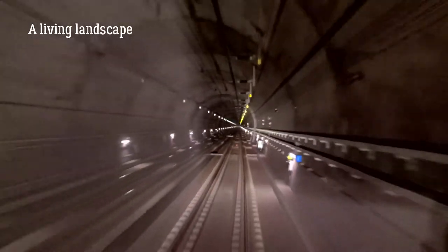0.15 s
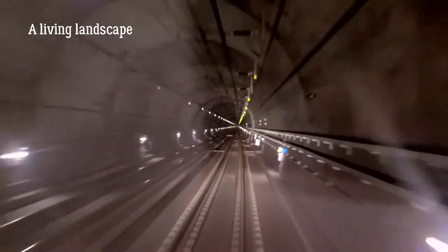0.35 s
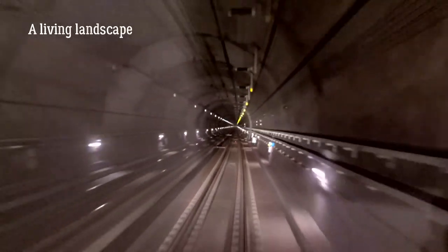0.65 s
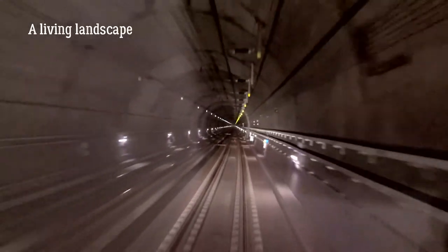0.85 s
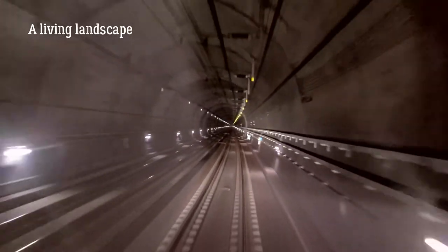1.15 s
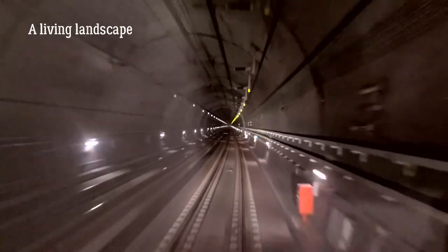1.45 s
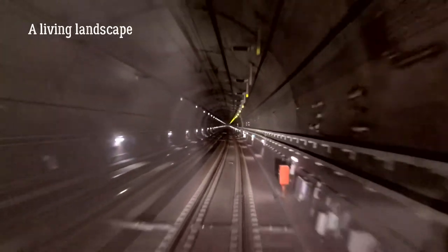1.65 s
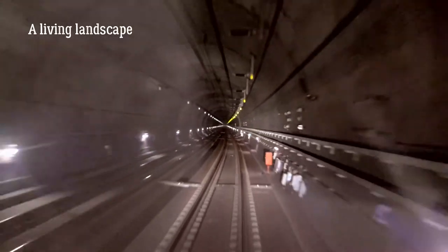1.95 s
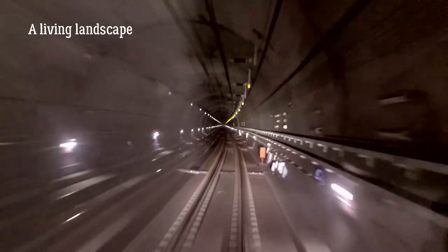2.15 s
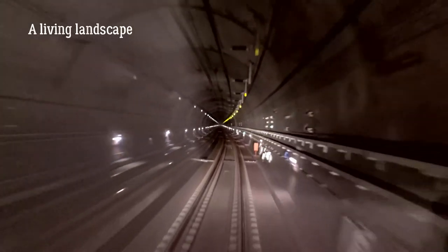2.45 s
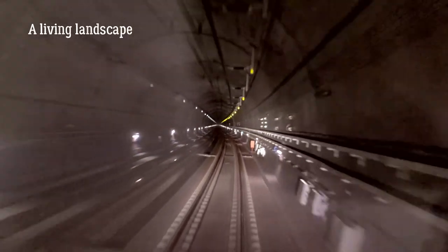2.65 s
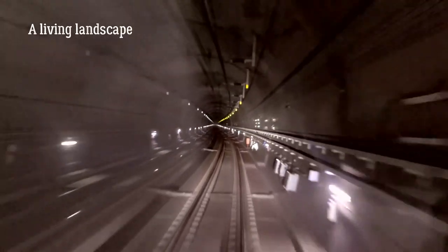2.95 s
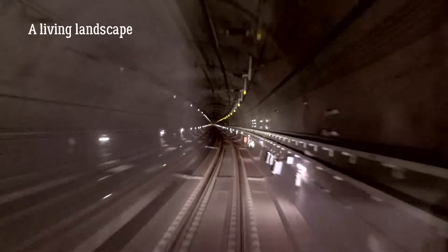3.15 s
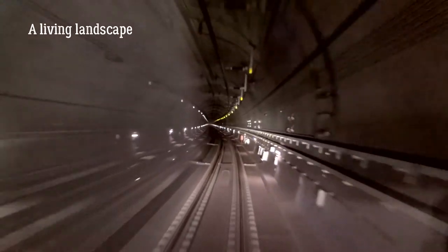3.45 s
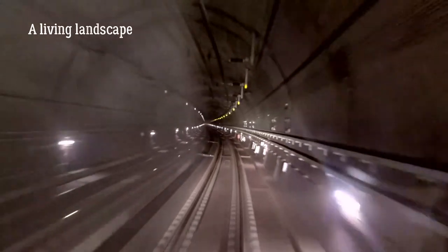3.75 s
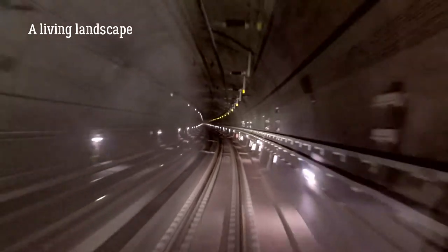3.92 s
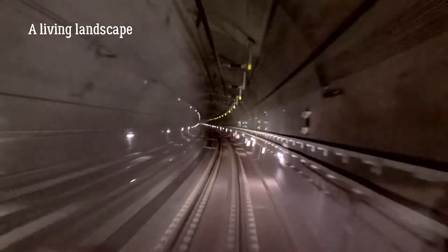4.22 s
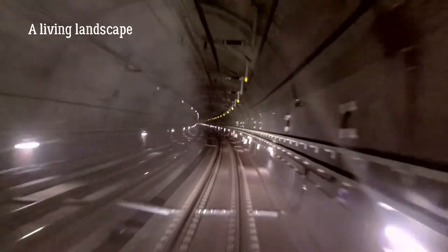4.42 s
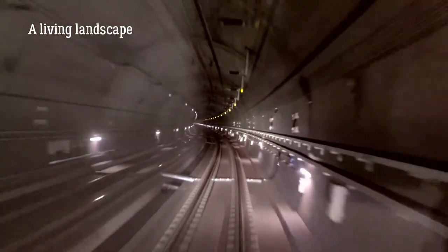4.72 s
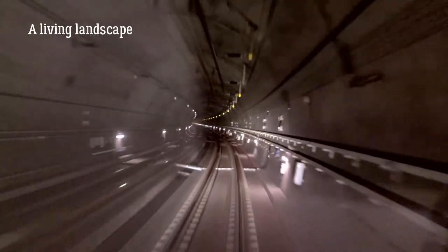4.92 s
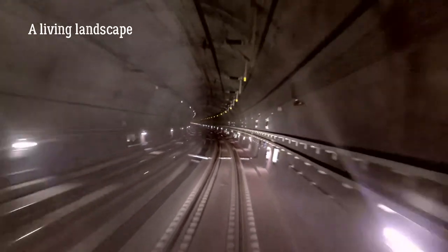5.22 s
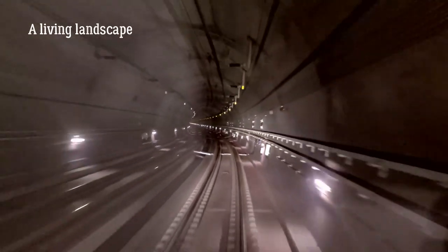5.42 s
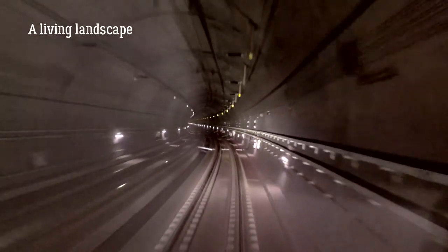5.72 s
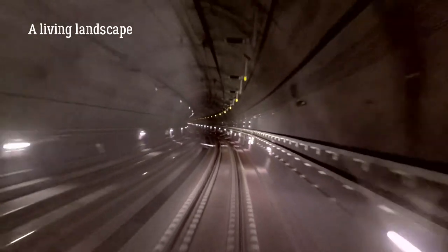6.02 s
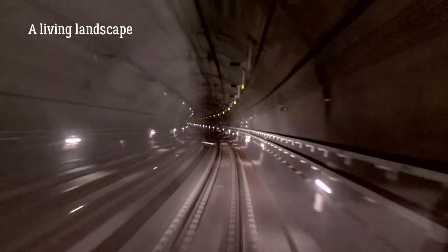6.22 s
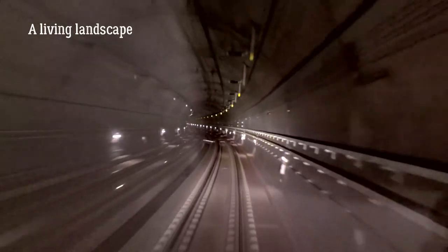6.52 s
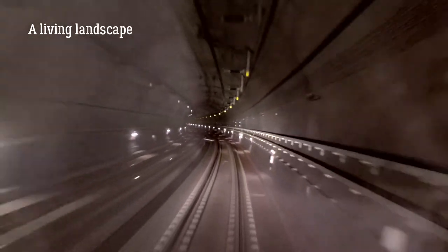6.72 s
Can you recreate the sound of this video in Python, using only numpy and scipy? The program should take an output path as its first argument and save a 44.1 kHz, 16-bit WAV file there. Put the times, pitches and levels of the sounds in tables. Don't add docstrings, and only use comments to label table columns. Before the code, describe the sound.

A continuous fast train run through an enclosed tunnel, with no stops or horn. Thick bass rumble and floor roar hold steady while low and middle humming notes flicker and glide unevenly. The second half gets rougher, with the rail singing more strongly in short swells. Weak rushing air, faint high motor whine and sparse soft clicks remain buried. Microphones are inside the cab, close and loud, bass central and upper tones spread wide.

```python
import sys
import numpy as np
from scipy import signal
from scipy.fft import rfft, irfft, next_fast_len
from scipy.io import wavfile
from scipy.ndimage import uniform_filter1d, minimum_filter1d, map_coordinates

SR = 44100
rng = np.random.default_rng(int(sys.argv[2]) if len(sys.argv) > 2 else 0)


def generate_wav(signal):
    frames = np.transpose(np.atleast_2d(signal))
    scaled = np.clip(frames, -1, 1) * 32767
    pcm = np.round(scaled).astype(np.int16)
    wavfile.write(sys.argv[1], SR, pcm)


def how_loud(loudness_db):
    steps = np.asarray(loudness_db, float) / 20
    return 10 ** steps


N = 302967

# (resting level [dB], share of load [dB/dB], unrest [dB], swell rise [s], swell fall [s])
HABITS = [(-26, .05, 2, 0.034, 0.044), (-35.5, 0.2, 2.5, 0.032, 0.026), (-40.5, 0.63, 0.5, 0.032, 0.023),
          (-34.5, 2.4, 1, 0.062, 0.046), (-37.5, .05, 4, 0.022, 0.048), (-37.5, 0.22, 3, 0.022, .035),
          (-47, 0.89, -1.5, 0.066, 0.029), (-43, 0.89, 5, 0.018, 0.018), (-36.5, .2, 2, .035, 0.02),
          (-38, 0.55, 3, 0.031, 0.025), (-40.5, .8, 3.5, 0.038, 0.024), (-41, .1, 3, 0.049, .045)]
# (time [s], peak level [dB], pitch [Hz])
RAIL_SWELLS = [(0.23, -28, 765), (0.41, -28.5, 781), (0.51, -25, 758), (0.68, -28, 777),
               (0.76, -28.5, 780.5), (0.93, -26.5, 772.3), (1.06, -29, 770.5), (1.18, -27.5, 767.3),
               (1.62, -26.5, 773), (1.74, -31, 771), (1.86, -30, 765.5), (2.03, -23.5, 780.4),
               (2.16, -30.5, 756.4), (2.4, -26, 769.4), (2.6, -26.5, 774), (2.76, -26, 763.4),
               (2.901, -22.5, 766.7), (3.05, -26, 782.6), (3.12, -35, 768), (3.33, -24.5, 769.4),
               (3.45, -21, 761), (3.75, -21, 767), (3.93, -26.5, 762.7), (4.01, -37, 769), (4.2, -31, 768),
               (4.31, -22, 770.7), (4.42, -29, 771), (4.61, -20.5, 763), (4.84, -36, 772.2),
               (4.96, -18.5, 770.3), (5.22, -21, 768.8), (5.38, -19.5, 767), (5.63, -17.5, 763.4),
               (5.76, -28.5, 762), (5.94, -33, 771), (6.09, -19, 768.7), (6.23, -20, 763),
               (6.4, -23.5, 771), (6.58, -24.5, 778.5), (6.76, -24, 773.4)]
# (time [s], lift [dB], length [s])
WHEEL_LIFTS = [
    (.3, -0.5, 0.36),
    (1.1, 0.5, 0.2),
    (2.3, 0, 0.2),
    (2.8, .9, 0.48),
    (3.6, -0.7, .8),
    (5.2, 1, .6),
    (6.05, 0, 0.54),
    (6.6, 1, 0.41),
]
PANEL_HZ = [86, 205, 235, 392, 503, 612, 688, 722, 782, 802, 842, 1480, 1584, 1875, 2008, 2166, 2296, 2623,
            5262, 5351, 5360, 8870, 11240]
# (width [Hz], rms level [dB], left-right [dB], likeness [-1..1])
PANELS = [(19.5, -27.5, -0.1, 1), (12.5, -32.5, 0.7, .999), (11.9, -37, 4, .999), (21, -35.5, 6, 0.033),
          (11.1, -37.5, 5.5, -0.22), (14, -37, 0.5, 0.042), (36, -34.5, 8.5, -0.5), (21, -37.5, 2.5, -0.91),
          (21.1, -42.5, 3, 0.12), (16, -37, 7.5, -0.19), (21, -42, 4, 0.55), (41, -54, -1.5, 0.64),
          (37, -51, 1, 0.3), (19, -58, -1.5, 0.16), (29, -58.5, -1, 0.34), (21, -63.5, -1.5, 0.42),
          (13, -63.5, 5, .61), (19, -67.5, 5, -0.00091), (41, -75, 2.5, .3), (22, -74, 3.5, .5),
          (240, -72.5, 7.5, -0.13), (120, -86.5, -5, -0.085), (7, -100, -4.5, .11)]


def along(points, hz):
    f, v = np.transpose(points)
    return np.interp(np.log(hz + 1), np.log(f + 1), v)


def curves(rows):
    s, *cols = np.transpose(rows)
    return [np.interp(np.arange(N) / SR, s, c) for c in cols]


def wobble(rate_hz):
    knots = rng.standard_normal(int(N / SR * 40))
    return map_coordinates(knots, [np.arange(N) * min(rate_hz, 39) / SR])


def grid_hz():
    return np.fft.rfftfreq(next_fast_len(N + 8192) // 2 * 2, 1 / SR)


def pair(gain, alike, lean_db):
    mid, side = rng.standard_normal((2, len(gain))) + 1j * rng.standard_normal((2, len(gain)))
    turn = np.arccos(np.clip(alike, -1, 1)) / 2
    mid, side = mid * np.cos(turn), side * np.sin(turn)
    left = (mid + side) * how_loud(lean_db / 2)
    right = (mid - side) * how_loud(-lean_db / 2)
    both = irfft(gain * np.array([left, right]))[:, :N]
    return both / np.std(both.mean(axis=0))


def load():
    # (time [s], load [dB])
    roughness = [
        (0, -2.5),
        (1.4, -2.5),
        (2.2, -1.5),
        (3.0, -1.5),
        (3.7, 1.2),
        (4.5, 0.6),
        (5.0, 0.9),
        (5.6, 1),
        (6.2, -0.2),
        (6.87, 2),
    ]
    slow_db = uniform_filter1d(curves(roughness)[0], size=SR // 4)
    return slow_db - slow_db.mean()


def swells(rows, rise_s, fall_s):
    s, db = np.transpose(rows)[:2, :, None]
    coarse = np.arange(0, N + 100, 100)
    t = coarse / SR - s
    flank_s = np.where(t < 0, rise_s, fall_s)
    power = np.sum(how_loud(db) ** 2 * np.exp(-(t / flank_s) ** 2), axis=0)
    return np.sqrt(np.interp(np.arange(N), coarse, power))


def gusts(rows):
    t = np.arange(N) / SR
    return sum(db * np.exp(-(2 * (t - s) / length_s) ** 2) for s, db, length_s in rows)


def roar():
    # (frequency [Hz], density [dB per Hz])
    rumble = [(8, -38.5), (20, -3), (32, -2), (52, 0.5), (70, -0.5), (105, -1), (150, -0.9), (186, -6),
              (230, -19.5), (400, -43), (700, -120)]
    floor = [(60, -120), (120, -26.5), (186, -7), (210, -0.5), (270, 1), (300, 1.5), (332, -0.5),
             (370, 2.5), (450, 1.5), (500, -3.5), (540, -5.5), (600, -16.5), (800, -39.5), (1200, -120)]
    rail = [(300, -120), (451, -30.5), (581, -2), (671, 0), (801, 4), (871, -12.5), (1001, -20.5),
            (1301, -49), (2000, -120)]
    wheel = [(400, -120), (601, -21.5), (881, 0), (951, 0), (1091, -1), (1211, -5), (1401, -8.5),
             (1601, -10), (1801, -15.5), (2551, -22.5), (3501, -25), (4101, -32), (5601, -38),
             (12000, -120)]
    hiss = [(1500, -120), (2501, -25.5), (4501, -1.5), (6301, -2.5), (8001, -4), (9501, -10.5),
            (10501, -12), (13001, -14), (16001, -18)]
    # (frequency [Hz], likeness [-1..1])
    likeness = [(25, .99), (60, .997), (200, .994), (300, .95), (380, .55), (470, 0), (580, -.4), (800, .4),
                (920, .15), (1010, -.2), (1180, -.8), (1300, -.6), (1400, 0), (1800, -.35), (2200, .3),
                (2700, -.1), (4000, .03), (8000, .2), (13000, .2)]
    # (frequency [Hz], left-right [dB])
    lean = [(151, -0.5), (261, 1), (401, 5.5), (521, 1.5), (801, 1), (1001, 0), (1201, -2), (1401, -0.8),
            (2701, 4), (3601, 2.1), (5001, 1.6), (7001, 4.5), (8801, -3), (15001, 1.3)]
    # (mean level [dB], share of load [dB/dB], slow sway [dB])
    paths = [
        (-20.5, .03, -0.3),
        (-20.5, 0.3, 0.2),
        (-27, 0.96, 0.6),
        (-34, 0.29, -0.7),
        (-63.5, .15, 0.15),
    ]
    # (time [s], lift [dB], length [s])
    air_gusts = [
        (1.448, 0.7, 0.59),
        (2.23, 3, 0.17),
        (2.577, 0, 0.2),
        (4.02, 2, 0.23),
        (4.338, 1, 0.15),
        (5.12, 1.5, 0.32),
        (5.8, -0.3, 0.53),
    ]
    hz = grid_hz()
    rail_swell = swells(RAIL_SWELLS, *HABITS[3][3:]) / how_loud(HABITS[3][0])
    rail_lift_db = 10 * np.log10(1 + 0.052 * rail_swell ** 2)
    lifts_db = (0, 0, rail_lift_db, gusts(WHEEL_LIFTS), gusts(air_gusts))
    colours = (rumble, floor, rail, wheel, hiss)
    flutters_db = (0.31, 1.2, 0.34, 0.59, 0.96)
    total = np.zeros((2, N))
    for (db, follow, sway_db), lift_db, colour, flutter_db in zip(paths, lifts_db, colours, flutters_db):
        level_db = db + follow * load() + sway_db * wobble(1.8) + lift_db
        noise = pair(how_loud(along(colour, hz)), along(likeness, hz), along(lean, hz))
        total += how_loud(level_db + flutter_db * wobble(7)) * noise
    return total


def hum():
    # (pitch drift [Hz], left-right [dB], left phase lead [rad])
    hummers = [(1.5, 0, -.08), (4, 2.8, 0), (3.5, 7, 0), (5, 5, -.2), (2, 0, 0), (2, 0, 0), (3, 1, 1.2),
               (4, 2, .3), (2, .7, 0), (4, 5, -.1), (5, 3, -.1), (4, 0, -.04)]
    # (time [s], peak level [dB], pitch [Hz])
    bounces = [(0.06, -16.5, 69.55), (0.55, -15.5, 66.45), (0.64, -16, 63.4), (0.72, -31, 67),
               (1.1, -15.5, 63.8), (1.26, -17, 62), (1.57, -16.5, 66.15), (1.9, -15, 69.4),
               (2.15, -17.5, 66.44), (2.25, -21.5, 64.84), (2.36, -17, 64), (2.54, -16, 64.9),
               (2.73, -12.5, 69.1), (3.28, -17, 64.45), (3.55, -24, 68.9), (3.69, -21, 66.1),
               (3.95, -18, 68.23), (4.09, -21, 68), (4.23, -16, 66.45), (4.34, -13, 68.07),
               (4.48, -20, 65.8), (4.57, -21, 64.2), (4.66, -19, 68.03), (4.89, -23, 65.63),
               (5.05, -16, 66.1), (5.18, -16, 65.06), (5.34, -17.5, 65.94), (5.58, -13, 70),
               (5.7, -14, 67.66), (5.88, -19, 67), (5.98, -17.5, 65.92), (6.41, -16, 69.88),
               (6.6, -16, 68.2), (6.76, -16.5, 65.46)]
    length_swells = [(0.02, -21, 289), (0.55, -19, 292), (0.69, -18.5, 296), (1.3, -16, 297),
                     (1.48, -16, 290), (1.9, -22, 296), (2.53, -21, 289), (2.89, -23, 290),
                     (3.04, -18.5, 299), (3.36, -18, 293), (3.48, -24, 298), (3.57, -19.5, 291),
                     (4.05, -21, 298), (4.19, -14.5, 291), (4.27, -15.5, 295), (4.57, -25.5, 291),
                     (5.1, -16.5, 299), (5.22, -24.5, 295), (5.44, -18, 295), (5.52, -16, 297),
                     (5.71, -27, 297), (6.43, -23, 298)]
    cross_swells = [(0.77, -24.5, 419.4), (0.93, -30, 421), (1.53, -23.5, 414), (1.91, -26.5, 420.3),
                    (2.16, -22.5, 418.5), (2.23, -19.5, 420.5), (2.34, -22, 423.3), (2.53, -22, 423),
                    (2.64, -26, 418.7), (2.74, -21, 422), (3.49, -17.5, 421), (4.11, -29, 422.2),
                    (4.32, -23, 417.5), (4.43, -22, 423.8), (4.51, -24.5, 428), (4.89, -20.5, 419.6),
                    (4.96, -32, 419.3), (5.109, -23, 419.6), (5.46, -23, 421), (5.6, -19, 424),
                    (5.76, -21, 413), (5.83, -12, 425.8), (5.9, -28, 425), (5.97, -28.5, 425),
                    (6.06, -17, 424), (6.12, -15.5, 425), (6.18, -18.5, 428.4), (6.24, -17.5, 423.6),
                    (6.29, -20, 427.7), (6.35, -16.5, 425.5), (6.51, -26, 422.7), (6.67, -23.5, 428)]
    floor_swells = [(0.94, -16.5, 87.7), (1.3, -21, 89.35), (1.67, -24, 90.7), (1.78, -18, 92),
                    (2.08, -17, 93.95), (2.94, -23, 88.86), (3.09, -16, 85.2), (3.4, -19, 89.8),
                    (4.21, -18, 89.9), (4.65, -21, 93.6), (5.1, -18, 87.8), (5.23, -15, 89.4),
                    (5.46, -18.5, 93.05), (5.73, -19.5, 90.5), (6.0, -21, 88), (6.54, -20, 87.74),
                    (6.66, -31, 88.4), (6.81, -18.5, 87.4)]
    door_swells = [(0.29, -26, 236), (0.52, -20, 234), (1.6, -23, 231), (1.94, -19, 237.8),
                   (2.07, -21, 232.9), (2.85, -18.5, 231.1), (3.02, -24, 238), (3.2, -22.5, 232.8),
                   (3.59, -22, 233), (3.81, -24, 233.4), (4.17, -29, 232.5), (4.47, -17.5, 237),
                   (4.69, -23, 234), (4.85, -22.5, 238.6), (5.22, -27, 232.7), (5.41, -23, 237.7),
                   (5.51, -32, 237), (5.64, -21, 230.2)]
    wall_swells = [(3.01, -28, 492), (3.12, -26, 496.6), (3.21, -30, 502), (3.48, -28, 488),
                   (3.76, -22.5, 495.7), (4.07, -25, 495), (4.28, -27.5, 490), (4.899, -26, 489.6),
                   (5.1, -25, 494), (5.23, -23, 496.9), (5.51, -22.5, 504.6), (6.04, -26, 502.5),
                   (6.42, -27, 508), (6.54, -34, 506.4)]
    roof_swells = [(2.21, -25, 650.3), (3.07, -28, 651.8), (3.42, -20.5, 668.3), (3.57, -26, 667.7),
                   (3.819, -24.5, 652), (4.05, -33, 653), (4.13, -20, 661.8), (4.3, -16.5, 626.6),
                   (4.5, -22, 661.2), (4.71, -20.5, 657), (4.91, -30, 658.3), (4.99, -26, 668),
                   (5.1, -22, 667.4), (5.19, -29, 648.4), (5.53, -21.5, 650.6), (5.61, -24, 665),
                   (5.72, -24, 627), (5.84, -23, 656.2), (5.97, -25, 657.3), (6.27, -24, 667.6),
                   (6.39, -24, 672), (6.76, -27, 669)]
    seat_swells = [(0.12, -16.5, 204), (1.29, -27, 204), (1.39, -28, 205.8), (2.5, -20, 205.5),
                   (2.8, -23, 204), (2.98, -23, 205.8), (3.54, -22.5, 207.1), (3.63, -20, 206.5),
                   (3.73, -28, 207), (3.88, -25.5, 206.2), (4.55, -22, 209.4), (4.71, -21.5, 207.3),
                   (4.91, -17, 207.2), (5.1, -17, 203.7), (5.28, -22, 207.6), (6.1, -29, 207),
                   (6.39, -21, 209), (6.68, -25, 204.5)]
    window_swells = [(0.019, -18, 392), (0.64, -23, 384), (0.96, -21, 390.7), (2.28, -18, 393.3),
                     (2.63, -17.5, 396), (2.73, -18.5, 389.7), (2.81, -29, 391.7), (2.97, -24, 396),
                     (3.32, -29, 394.8), (3.46, -28, 393.9), (3.58, -21, 391.8), (3.87, -25, 396),
                     (4.26, -26, 391.6), (4.57, -29.5, 390.7), (4.64, -24, 388.5), (4.78, -26, 386.8),
                     (4.86, -23, 392.4), (5.01, -24, 392.4), (5.57, -18, 390), (5.85, -20.5, 396.6),
                     (5.93, -19, 394.2), (6.13, -23.5, 387.9), (6.23, -19.5, 393.8), (6.331, -12.5, 392.2),
                     (6.45, -19, 390), (6.54, -21, 391)]
    web_swells = [(0.41, -27, 793), (0.601, -24, 797), (1.639, -29, 802), (2.0, -26, 796), (2.59, -28, 791),
                  (2.66, -23.5, 790), (2.9, -25.5, 785.6), (3.04, -18, 795.5), (3.2, -27, 803),
                  (3.43, -27, 796.6), (3.6, -22.5, 797), (3.72, -17, 788.2), (3.88, -26, 787),
                  (4.0, -16, 786), (4.31, -26, 798), (4.6, -22, 792), (4.96, -26, 783), (5.15, -33, 791.6),
                  (5.22, -29, 780.4), (5.34, -30, 798), (5.43, -20, 776), (5.59, -25, 786),
                  (5.74, -24, 796), (5.94, -26, 779.5), (6.09, -19, 774.3), (6.28, -22, 796.6),
                  (6.4, -31, 784), (6.58, -31, 790), (6.75, -22, 787.6), (6.82, -29, 795)]
    bogie_swells = [(0.09, -22.5, 134.6), (0.35, -21.5, 144.1), (0.53, -22.5, 137.7), (0.69, -20, 137.5),
                    (1.07, -21.5, 144.6), (1.23, -25, 136), (1.48, -23, 143.5), (1.7, -21.5, 144.3),
                    (2.27, -23.5, 136), (2.88, -23.5, 139.9), (3.28, -23, 134.4), (3.53, -24, 142.1),
                    (4.29, -25.5, 141), (5.36, -23.5, 139), (5.68, -27, 141.9), (6.37, -26, 136.2)]
    feeds = (bounces, length_swells, cross_swells, RAIL_SWELLS, floor_swells, door_swells,
             wall_swells, roof_swells, seat_swells, window_swells, web_swells, bogie_swells)
    side = np.array([[.5], [-.5]])
    total = np.zeros((2, N))
    for rows, habit, (drift_hz, lean_db, lead_rad) in zip(feeds, HABITS, hummers):
        rest_db, follow, unrest_db, rise_s, fall_s = habit
        resting = how_loud(rest_db + follow * load() + unrest_db * wobble(9))
        level = np.hypot(resting, how_loud(-3.0) * swells(rows, rise_s, fall_s))
        hz = curves(rows)[1]
        phase = 2 * np.pi * np.cumsum(hz + drift_hz * wobble(16)) / SR
        spread = lead_rad + hz / 1500 * wobble(2.5)
        total += np.sqrt(2) * level * how_loud(lean_db * side) * np.sin(phase + spread * side)
    return total


def resonances(modes, follow):
    hz = grid_hz()
    gain, alike, lean = np.zeros((3, len(hz)))
    for centre_hz, width_hz, db, lean_db, likeness in modes:
        detuning = (hz - centre_hz) / (width_hz / 2)
        power = how_loud(db) ** 2 / width_hz / (1 + detuning ** 2) ** 2
        gain += power
        alike += power * likeness
        lean += power * lean_db
    loudness = np.sqrt(sum(how_loud(row[2]) ** 2 for row in modes))
    return loudness * how_loud(follow * load()) * pair(np.sqrt(gain), alike / gain, lean / gain)


def panels():
    modes = [(hz, *row) for hz, row in zip(PANEL_HZ, PANELS)]
    low = resonances(modes[:3], follow=0.15)
    middle = resonances(modes[3:11], follow=1.0)
    high = resonances(modes[11:18], follow=0.12) * how_loud(.4 * gusts(WHEEL_LIFTS))
    return low + middle + high


def singing():
    # (start [s], length [s], pitch [Hz], level [dB], left-right [dB])
    sections = [
        (5.7, 0.51, 503, -26.5, 3),
        (4.2, 0.18, 710, -26, 2),
        (5.3, .2, 520, -35.5, 5),
        (5.6, 0.14, 440, -29.5, 4),
        (5.3, .28, 710, -38, 2),
    ]
    total, t = np.zeros((2, N)), np.arange(N) / SR
    side = np.array([[.5], [-.5]])
    lead_rad = np.array([[.4], [-.4]])
    for s, length_s, hz, db, lean_db in sections:
        swell = np.sin(np.pi * np.clip((t - s) / length_s, 0, 1)) ** 2.9
        phase = 2 * np.pi * np.cumsum(hz + 3.58 * wobble(14)) / SR
        total += how_loud(db + 8.0 + lean_db * side) * swell * np.sin(phase + lead_rad)
    return total


def whine():
    # (time [s], lift [dB], length [s])
    lifts = [
        (.4, 1.5, 1.1),
        (2.0, -3, 1.4),
        (4.6, -3, .4),
        (5.5, 4, .9),
        (6.1, -3.5, .15),
        (6.3, 4.5, .4),
    ]
    modes = [(hz, *row) for hz, row in zip(PANEL_HZ[18:], PANELS[18:])]
    return resonances(modes, follow=.2) * how_loud(.4 * wobble(2.1) + gusts(lifts))


def ticks():
    # (time [s], start level [dB], t60 [s], centre [Hz], top end [dB])
    snaps = [(.21, -52, .08, 5500, -30), (1.1, -52, .1, 5500, -34), (2.206, -50, .12, 7500, -13),
             (2.55, -58, .2, 11000, -6), (3.93, -56, .6, 7500, -30), (4.359, -51, .08, 7500, -16),
             (4.784, -57, .03, 12000, -3), (5.16, -48, .14, 6800, -9), (5.232, -47, .07, 8200, -18),
             (5.572, -58, .03, 12000, -3), (5.62, -57, .02, 13000, -3), (5.775, -44.5, .22, 6500, -40),
             (6.397, -42.5, .13, 7200, -8)]
    total, t = np.zeros((2, N + SR)), np.arange(SR // 4) / SR
    hz = np.fft.rfftfreq(len(t), 1 / SR)
    for s, db, t60_s, centre_hz, top_db in snaps:
        decay = how_loud(db - 60 * t / t60_s) * (1 - np.exp(-t / .0004))
        burst = rng.standard_normal((2, len(t))) * decay
        damping = 1j * hz * 3200
        ring = (damping / (centre_hz ** 2 - hz ** 2 + damping)) ** 2 + how_loud(top_db) * (hz > centre_hz)
        start = round(s * SR)
        total[:, start:start + len(t)] += irfft(rfft(burst) * ring * (hz > 3500), len(t))
    return total[:, :N]


def scene():
    return roar() + hum() + panels() + singing() + whine() + ticks()


def top_cut(x):
    return signal.sosfilt(signal.butter(12, 15720, fs=SR, output="sos"), x)


def record(dry):
    need = np.minimum(1, 1.0 / (np.abs(dry) + 1e-9))
    held = minimum_filter1d(need, size=441)
    gain = uniform_filter1d(uniform_filter1d(held, size=220), size=220)
    fade = np.minimum(1, np.arange(N, 0, -1) / 130)
    return top_cut(dry * gain * fade)


dry = scene()
out = record(dry)
generate_wav(out)
```